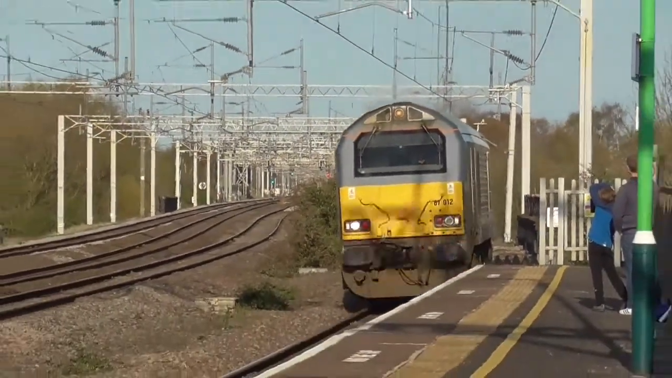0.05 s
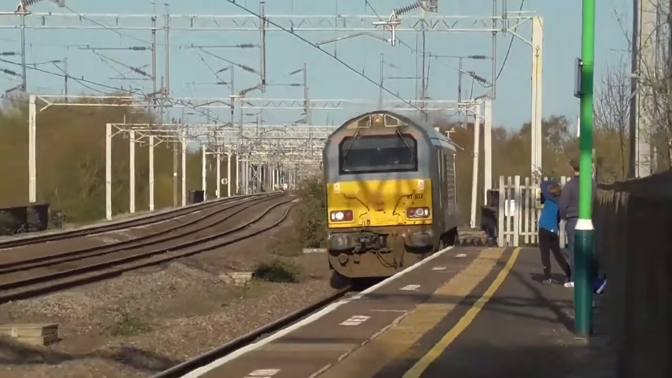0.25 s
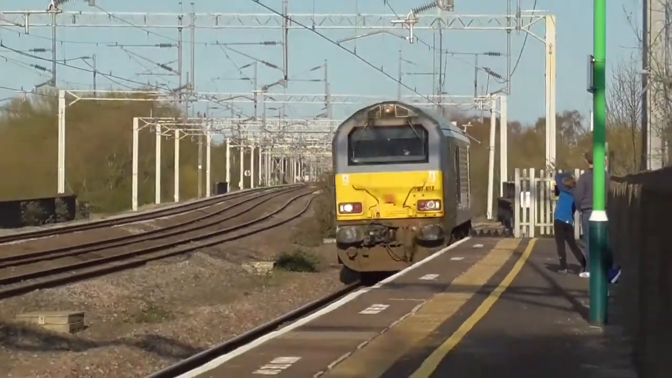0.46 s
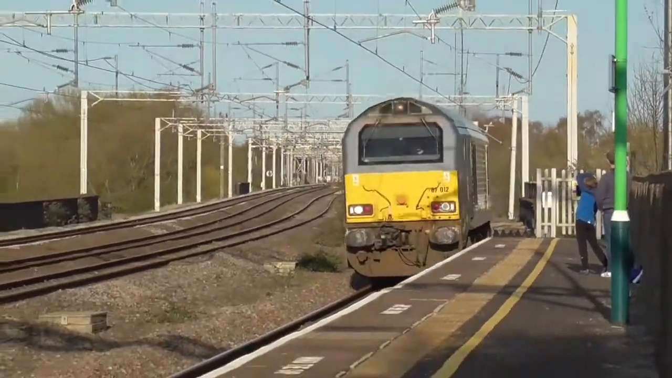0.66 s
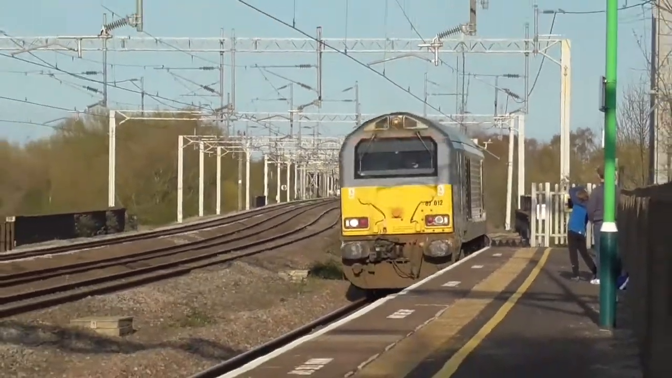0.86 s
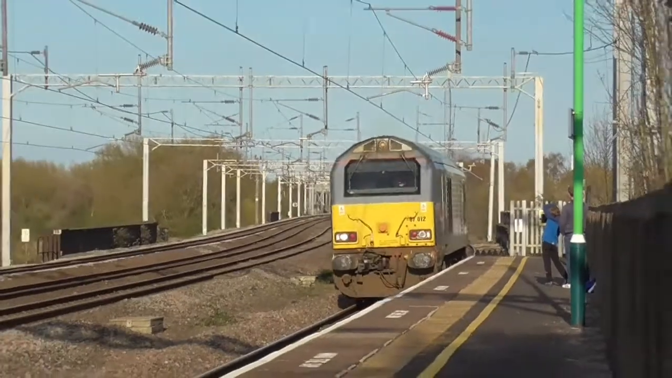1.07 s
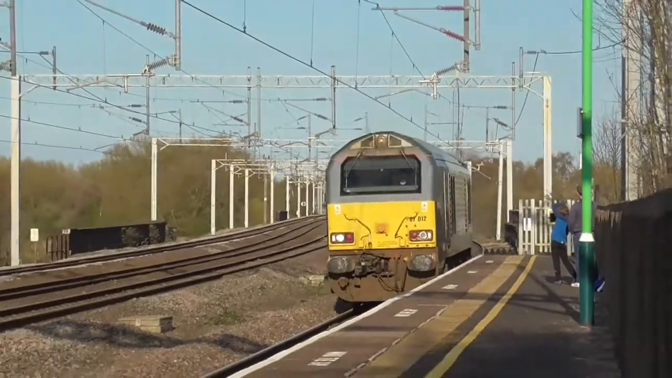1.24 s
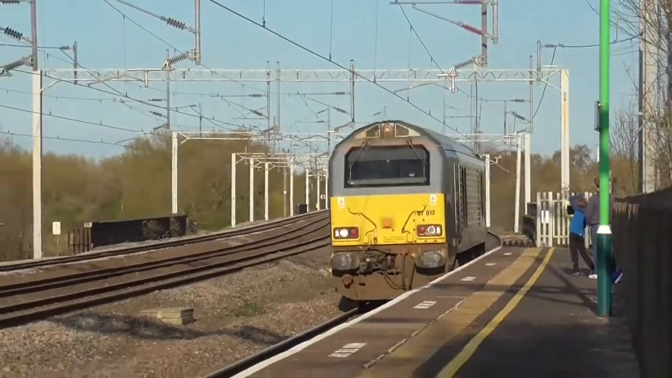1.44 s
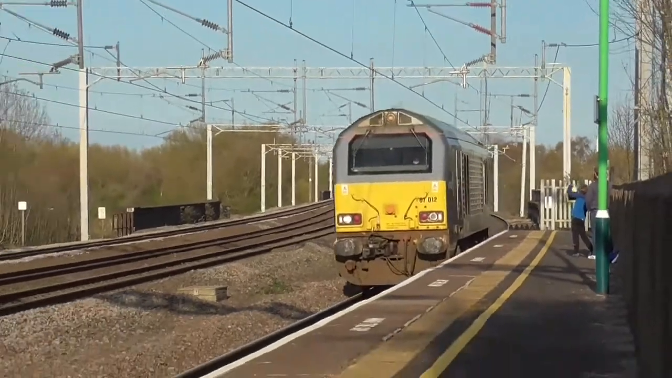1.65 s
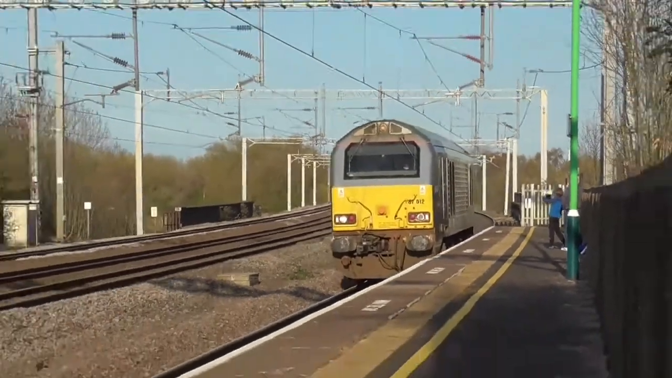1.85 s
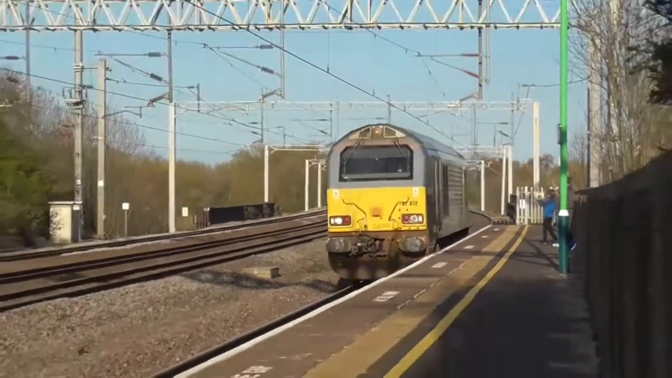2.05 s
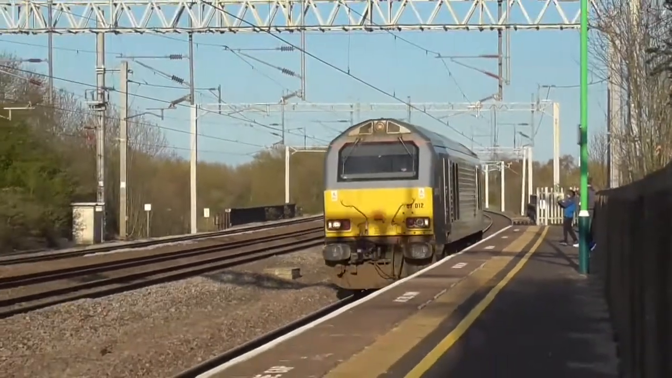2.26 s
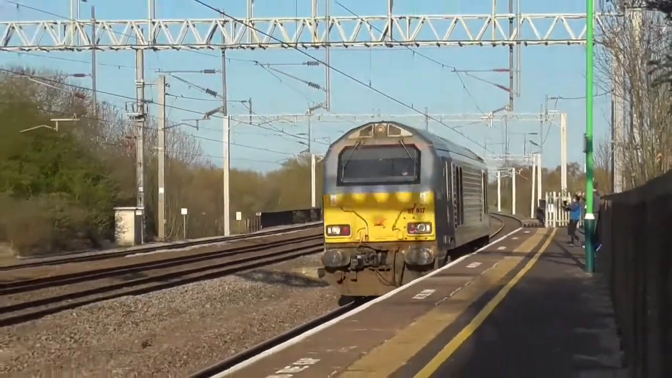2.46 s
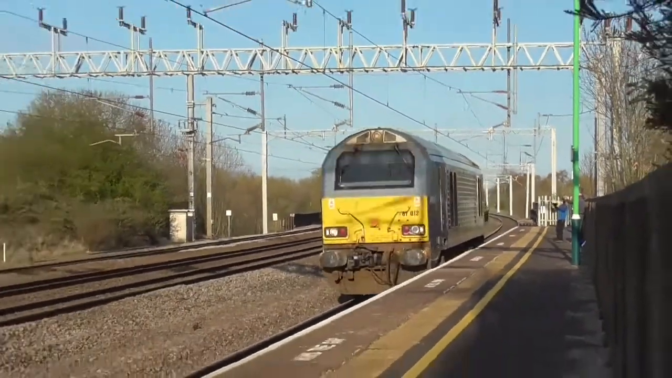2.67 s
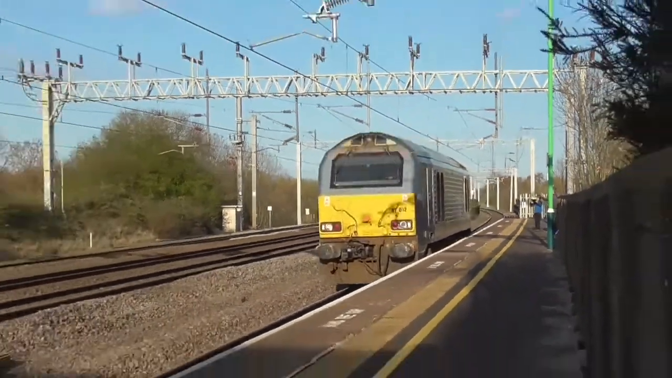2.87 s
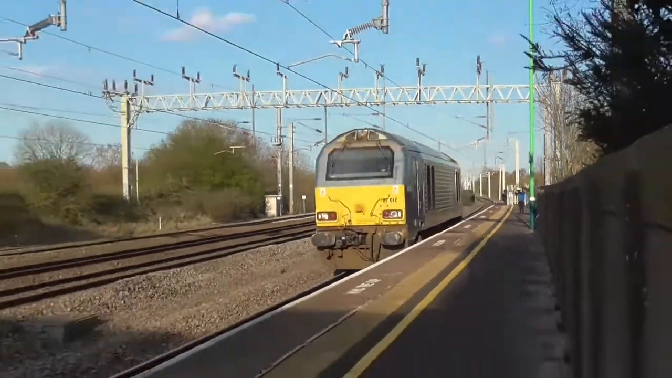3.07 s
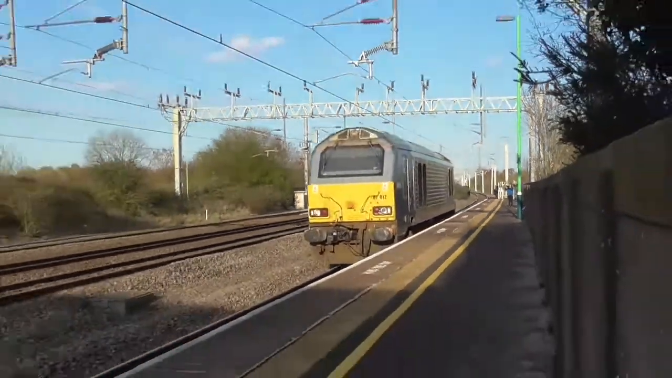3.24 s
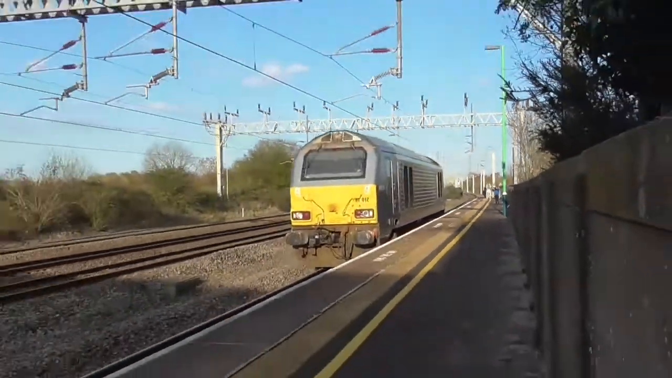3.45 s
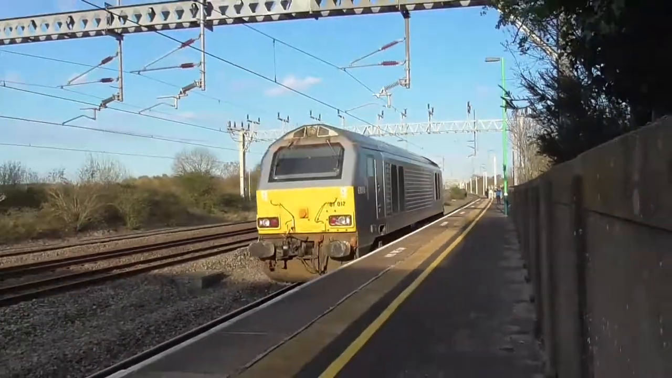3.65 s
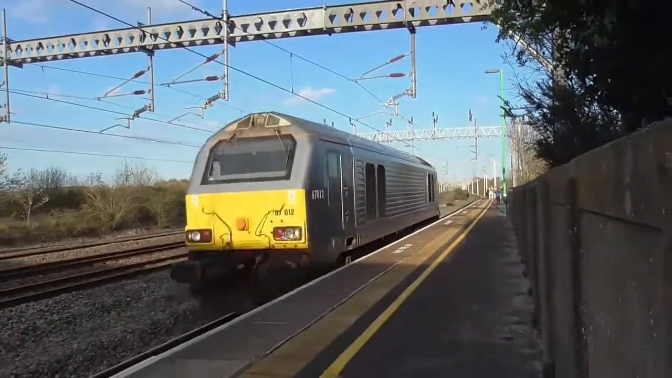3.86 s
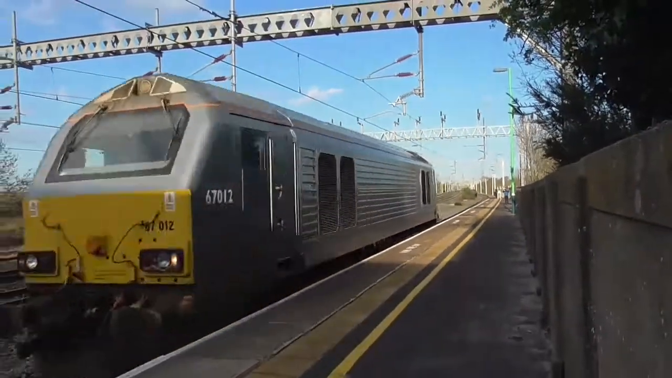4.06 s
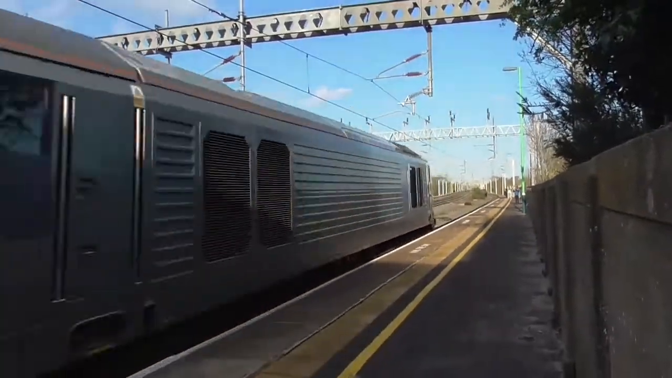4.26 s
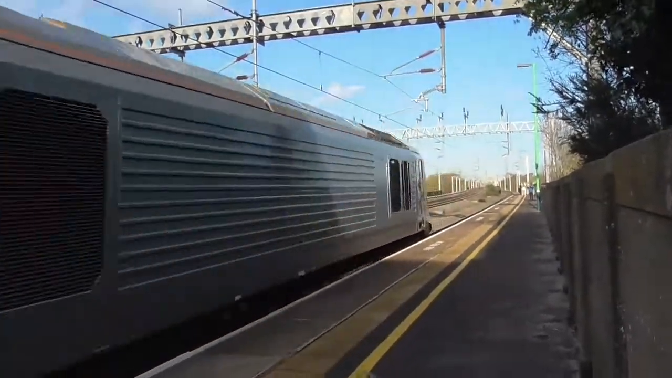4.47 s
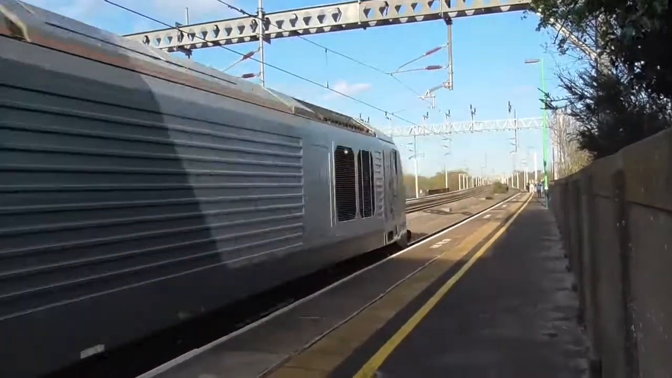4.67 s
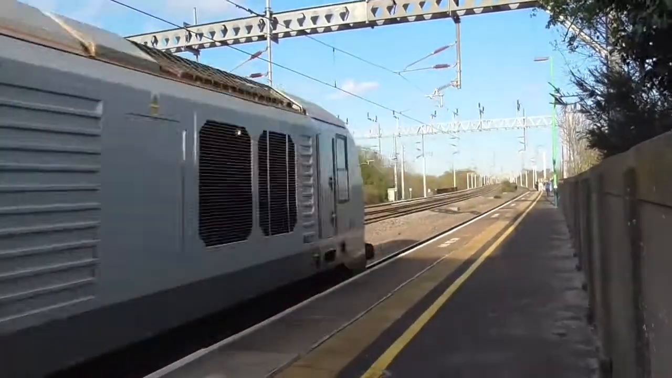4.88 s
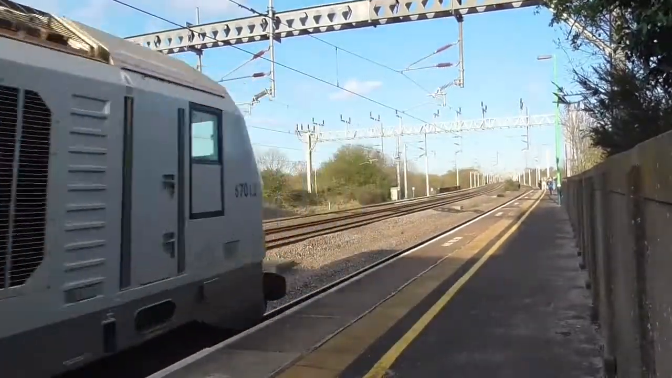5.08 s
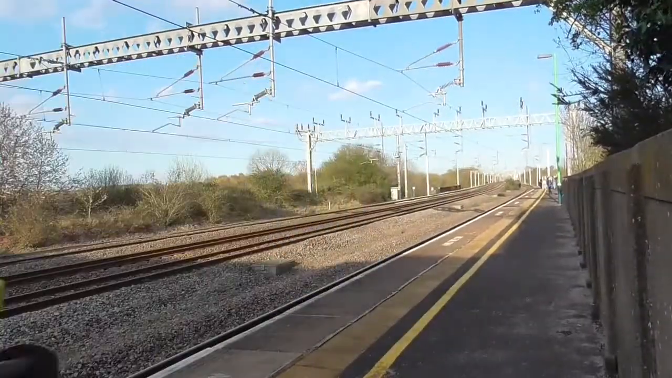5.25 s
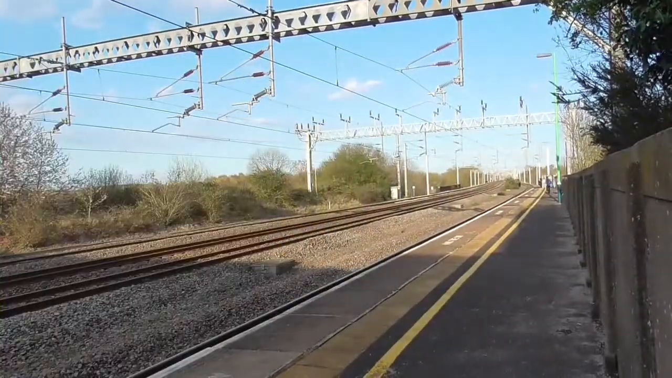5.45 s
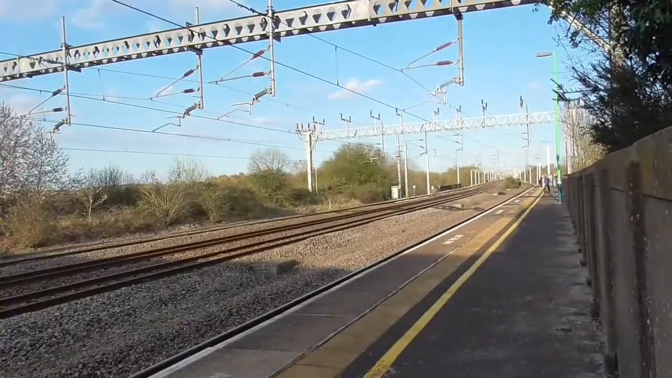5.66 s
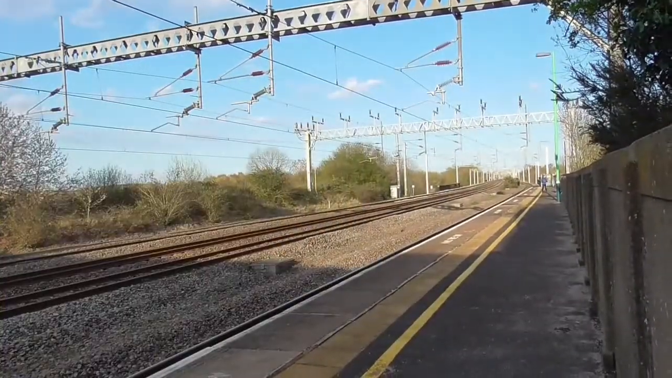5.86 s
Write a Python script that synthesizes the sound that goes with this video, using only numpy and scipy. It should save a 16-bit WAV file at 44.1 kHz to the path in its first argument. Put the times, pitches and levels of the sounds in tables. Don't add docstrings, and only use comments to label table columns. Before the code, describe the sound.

Throbbing diesel engine and wheel roar swell along the rails, a sharp air burst cuts in, then the locomotive thunders by and its pitch sags.

```python
import sys
import numpy as np
from scipy import signal
from scipy.fft import rfft, irfft, next_fast_len
from scipy.io import wavfile
from scipy.ndimage import uniform_filter1d, map_coordinates

SR = 44100
rng = np.random.default_rng(int(sys.argv[2]) if len(sys.argv) > 2 else 0)


def amplitude_ratio(level_db):
    exponent = np.asarray(level_db, float) / 20
    return 10 ** exponent


def persist_wave(psi):
    counts = np.round(np.clip(psi, -1, 1) * 32767).astype(np.int16)
    wavfile.write(sys.argv[1], SR, np.atleast_2d(counts).T)


N = 260895

# (time [s], speed [turns/s])
SHAFT_SPEED = [(0, 6.027), (3.9, 6.027), (4.3, 6.0), (4.6, 5.9), (5.0, 5.66), (5.4, 5.61), (5.92, 5.59)]
# (multiple of shaft speed [1], level [dB])
EXHAUST_ORDERS = [(6, -54.5), (9, -45), (10, -53.5), (11, -45.5), (13, -48), (15, -36), (16, -42),
                  (25, -57.5), (28, -51), (29, -56), (30, -41), (31, -57.5), (33, -50), (34, -48),
                  (35, -41), (36, -48.5), (37, -58), (38, -51.5), (39, -51.5), (41, -49.5), (42, -43.5),
                  (43, -47.5), (45, -48), (46, -46), (47, -48), (48, -42.5), (50, -53), (52, -43),
                  (56, -46.5)]
# (time [s], level [dB])
HARMONIC_SWELL = [(0, 1), (1.5, 4.5), (2.6, -9), (2.9, 11.5), (3.4, 9.5), (3.7, 8), (4.15, 7), (4.45, 10.5),
                  (4.65, -9), (5.2, -1), (5.5, 9.5), (5.92, 1)]
# (frequency [Hz], density [dB per Hz])
BOOM_SPECTRUM = [(97, -33), (165, -10), (194, -1.5), (303, -6), (368, -1), (450, -13), (580, -24),
                 (990, -120)]
ROAR_SPECTRUM = [(220, -59), (380, 4), (409, -2), (465, 2.5), (527, 2), (650, -5.5), (840, -46),
                 (1430, -120)]
CLANK_SPECTRUM = [(560, -1), (630, -2), (780, 4), (940, -3.5), (1030, -11.5)]
RATTLE_SPECTRUM = [(850, -13), (930, -1), (1240, -4.5), (1420, -6.5), (1500, -12.5), (1840, -24.5),
                   (2100, -20.5)]
JET_SPECTRUM = [(7000, -27), (7900, -4), (9300, -1.5), (11000, -5.5), (12000, -19)]
NOZZLE_SPECTRUM = [(5500, -14), (6100, -7), (6900, -2), (7700, -4.5), (8500, -32)]
FIZZ_SPECTRUM = [(10500, -16), (11500, 0), (13000, -2), (14200, -12), (14800, -26), (15700, -30)]
PIPE_SPECTRUM = [(4000, -37), (4400, -3), (4800, -2), (5600, -5.5), (6200, -11)]
PUFF_SPECTRUM = [(900, 0.5), (1400, 1), (1800, -14), (2700, -9.5), (3350, -5), (3650, -0.5), (4150, -4.5),
                 (4600, -12)]
BLADE_SPECTRUM = [(1600, -7), (1900, -8), (2250, -2.5), (2650, -10), (3100, -6.5)]
GRILLE_SPECTRUM = [(2700, -9), (3050, -6.5), (3350, -1.5), (3650, -1.5), (4150, -6.5), (4600, -6.5)]
SLIPSTREAM_SPECTRUM = [(10000, -12), (12500, -2), (14500, 0), (15700, -3)]
# (start [s], end [s], start frequency [Hz], end frequency [Hz], level [dB])
WHINE_TONES = [(-.2, 1.2, 818, 830, -48), (2.1, 3.2, 843, 848, -47), (.6, 3.6, 563, 567, -49),
               (1.2, 3.7, 476, 478, -45), (2.2, 3.7, 505, 508, -45), (2.2, 3.5, 543, 543, -46),
               (2.6, 3.7, 724, 726, -47), (1.2, 2.7, 945, 950, -55), (4.5, 5.0, 955, 940, -38),
               (2.2, 3.6, 1412, 1420, -56), (5.5, 5.92, 640, 630, -35), (4.52, 4.85, 195, 185, -25),
               (4.75, 5.15, 292, 288, -30), (2.5, 3.5, 5555, 5565, -63), (.6, .8, 2140, 2125, -62),
               (1.15, 2.8, 2195, 2224, -65), (2.68, 3.03, 2222, 2230, -58), (0, 1.2, 6850, 6850, -63),
               (.8, 1.3, 7130, 7150, -63), (1.52, 2.15, 7135, 7190, -59), (2.0, 3.7, 7200, 7300, -65),
               (2.65, 3.15, 6900, 6930, -56), (2.7, 3.4, 6570, 6585, -61), (3.85, 4.8, 8225, 8070, -46)]
# (start [s], end [s], start frequency [Hz], level [dB], width [Hz])
PANEL_HOWLS = [
    (.41, 0.456, 7400, -54, 400),
    (4.098, 4.55, 374, -26, 50),
    (4.498, 5.2, 1415, -39.5, 40.1),
    (4.75, 5.45, 489.3, -25.5, 90),
    (4.799, 5.45, 693, -23.5, 159.6),
]
# (frequency [Hz], likeness [0-1])
COHERENCE = [(60, 1), (120, 0.96), (240, 1), (480, 0.81), (950, 0.77), (1890, 0.63), (3770, 0.62),
             (7520, 0.074), (15000, 0.049)]
# (frequency [Hz], left-right difference [dB])
PORT_COLOUR = [(60, 0), (130, -1.5), (290, 1), (640, 2.0), (1410, 1.5), (3100, 1.0), (6820, 2), (15000, -2)]
# (time [s], side level [dB], left-right difference [dB], echo scramble [0-1])
PASSING_BODY = [(0, 0, 0, 0.23), (2, 0, 0.5, 0), (3.5, -0.5, -1, 0.12), (4.1, -2, -1, 0.36),
                (4.5, 2, 0, 0.84), (5.0, 3, 0.5, 0.84), (5.4, 4, 1, 0.9), (5.92, 4, 1, 1)]
APPROACH = {"deep": (-26, 4.5, 1.26, 1.27, 3), "throb": (-23, 4.5, 1.05, 1.38, 0.86),
            "gap": (-25, 4.5, 1.5, 3, 3), "drone": (-18.5, 4, 1.31, 1.35, 1.16),
            "roar": (-23, 5, 1.05, 1.47, 1.5), "clank": (-27, 4.5, 0.8051, 1.38, 1.5),
            "rattle": (-28.5, 4.5, .8, 1.5, 1.5), "blades": (-40.5, 4.5, .7, 1.43, 1.3),
            "grilles": (-40.5, 4.5, 0.77, 1.4, 2), "seep": (-47, 4, 1.13, 0.83, 1.7),
            "hiss": (-47.5, 4.6, 0.95, 1.14, 2.1)}
# (part, time [s], width [s], level [dB])
PART_SWELLS = [("throb", 5.54, .06, 4), ("deep", 2.75, .3, 2.5), ("deep", 3.56, .15, -2.5),
               ("deep", 5.41, .06, -5), ("deep", 4.9, 0.054, -10), ("throb", 2.44, 0.22, 2),
               ("throb", 2.96, 0.15, -11), ("throb", 3.7, 0.18, 4.5), ("throb", 4.76, 0.085, -16),
               ("throb", 5.92, 0.052, -4), ("grilles", 1.68, .2, 4.5), ("gap", 4.4, 0.12, -4),
               ("gap", 5.9, .12, 14.4), ("drone", 4.14, 0.048, 4), ("drone", 4.3, 0.067, -6),
               ("drone", 5.15, 0.14, -4.5), ("drone", 5.5, 0.06, -4), ("drone", 5.8, 0.15, 2.9),
               ("roar", 0.37, 0.2, -3.5), ("roar", 4.6, 0.066, -1.5), ("clank", 4.6, 0.11, -7),
               ("drone", 4.85, 0.14, -2.5), ("seep", 0.59, 0.17, -2.5), ("roar", 5.1, 0.17, -6),
               ("seep", 5.0, .25, 4), ("clank", 5.1, 0.068, -1), ("rattle", 2.84, 0.47, -3.3),
               ("rattle", 4.1, .08, -4), ("hiss", 5.15, .2, 3), ("blades", 5.1, 0.094, 5.9)]
# (time [s], roar [dB], clank [dB], rattle [dB])
RAIL_JOINTS = [
    (.76, 3.5, 2, 0),
    (1.56, 0, 2, 3),
    (3.75, 4, 5, -0.5),
    (4.92, 1, 2, -1.5),
    (5.06, 4.5, 1, 2),
    (5.2, 0.5, -4, 1),
    (5.45, -0.5, 1, 5),
    (5.8, 2.5, 3, 2),
]
VENT_KINDS = {"leak": (0.23, 8, -2, -.5, -13.5, -21), "whistle": (.17, 9.5, 1.5, -3.5, -11, -27),
              "bleed": (0.45, 13, -7, -10.5, -6, -17), "chuff": (.022, 14, -8, -9, -7, -0.5),
              "blast": (.025, 14, -7.5, -4.5, -12.5, -8.5), "spit": (0.01, 13, -3, -5.5, -4, -15)}
# (kind, start [s], hold [s], jet level [dB], fall [dB/s])
AIR_RELEASES = [("leak", -0.13, 0.046, -44.5, 44), ("spit", 0.385, 0.013, -59, 120),
                ("leak", 0.81, 0.091, -47, 46), ("chuff", 1.46, 0.011, -39.5, 103),
                ("whistle", 2.596, .4, -43.5, 20), ("bleed", 3.08, 0.47, -40.5, 40),
                ("blast", 3.756, .04, -24, 110), ("blast", 3.805, .13, -21, 110),
                ("spit", 4.24, 0.023, -27.5, 175), ("spit", 4.525, 0.025, -36.5, 51),
                ("chuff", 5.08, .015, -41.5, 110), ("spit", 5.54, .015, -55.5, 61)]


def unit(x):
    return x / np.sqrt(np.mean(x ** 2) + 1e-20)


def along(points, hz):
    f, v = np.transpose(points)
    return np.interp(np.log(hz + 1), np.log(f + 1), v)


def curves(rows):
    s, *columns = np.transpose(rows)
    return [np.interp(np.arange(N) / SR, s, column) for column in columns]


def wobble(rate):
    knots = rng.standard_normal(int(N * rate / SR) + 4)
    return map_coordinates(knots, [np.arange(N) * rate / SR], order=1)


def bell(s, width):
    return np.exp(-((np.arange(N) / SR - s) / width) ** 2)


def filtered(x, response):
    m = next_fast_len(N + 8192)
    return irfft(rfft(x, m) * response(np.fft.rfftfreq(m, 1 / SR)), m)[..., :N]


def rush(spectrum, patchy_db, streak_db):
    z = signal.stft(rng.standard_normal((2, N)), nperseg=1024)[2]
    chance = rng.standard_normal((2, *z.shape[1:]))
    patches = uniform_filter1d(uniform_filter1d(chance[0], size=8, axis=0), size=6, axis=1)
    streaks = uniform_filter1d(chance[1], size=24, axis=1)
    gain = amplitude_ratio(patchy_db * unit(patches) + streak_db * unit(streaks))
    pair = signal.istft(z * gain, nperseg=1024)[1][:, :N]
    closed = [(spectrum[0][0] * .9, -120), *spectrum, (spectrum[-1][0] * 1.1, -120)]

    def mid_side_response(hz):
        turn = np.arccos(np.clip(along(COHERENCE, hz), -1, 1)) / 2
        return amplitude_ratio(along(closed, hz)) * [np.cos(turn), np.sin(turn)]

    mid, side = filtered(pair, mid_side_response)
    return unit(np.array([mid + side, mid - side]))


def heard(part):
    db, s, reach, coming, going = APPROACH[part]
    away = (np.arange(N) / SR - s) / reach
    swells = sum(gain_db * bell(at, width) for name, at, width, gain_db in PART_SWELLS if name == part)
    return db - 10 * np.log10(1 + away ** 2) * np.where(away < 0, coming, going) + swells


def engine():
    turns = np.cumsum(curves(SHAFT_SPEED)[0]) / SR - .785
    swell_db = curves(HARMONIC_SWELL)[0]
    scramble = curves(PASSING_BODY)[2]
    groups = np.zeros((4, 2, N))
    faint = dict.fromkeys(range(17, 56), -62)
    for k, db in {**faint, **dict(EXHAUST_ORDERS)}.items():
        high, fourth = k > 17, k == 48
        lag = .81 + .2 * (k == 13) + rng.uniform() * high
        drift = (.08 + .3 * high) * wobble(2)
        drift = drift + (.25 * scramble * (1 + 7 * high) + .3 * fourth) * wobble(7)
        ports = np.array([[1], [-1]]) * (.19 + .1 * scramble * high) * (.4 + wobble(2))
        level_db = db + 45 + swell_db * fourth - 5 * scramble * (k == 16)
        level_db = level_db + (.6 + scramble + high * (not fourth) * 1.6) * wobble(2.5)
        level_db = level_db + 2 * fourth * wobble(12)
        tone = np.cos(2 * np.pi * (k * turns - lag) + drift + ports)
        groups[np.digitize(k, [14, 17, 28])] += amplitude_ratio(level_db) * tone
    deep, throb, gap, drone = (unit(group) for group in groups)
    deep_noise = rush([(24, -16), (50, 0), (100, 0), (115, -6)], patchy_db=1, streak_db=0)
    gap_noise = rush([(100, 17), (120, -7), (150, 0.0), (170, 7)], patchy_db=1.0, streak_db=2.5)
    deep = deep + amplitude_ratio(-14 + 7 * scramble) * deep_noise
    gap = amplitude_ratio(-3) * gap + amplitude_ratio(-4) * gap_noise
    drone = amplitude_ratio(-2) * drone + amplitude_ratio(-5) * rush(BOOM_SPECTRUM, patchy_db=2, streak_db=1)
    parts = {"deep": deep, "throb": throb, "gap": gap, "drone": drone}
    return sum(amplitude_ratio(heard(name)) * part for name, part in parts.items())


def rolling():
    shake = amplitude_ratio(0.58 * wobble(11))
    jolts_db = sum(np.array(db)[:, None] * bell(s, .05) for s, *db in RAIL_JOINTS)
    parts = zip(("roar", "clank", "rattle"), jolts_db, (ROAR_SPECTRUM, CLANK_SPECTRUM, RATTLE_SPECTRUM))
    return shake * sum(amplitude_ratio(heard(name) + db) * rush(spectrum, patchy_db=0.62, streak_db=2.5)
                       for name, db, spectrum in parts)


def whines():
    out = np.zeros((2, N))
    narrow = [(*row, 6 + .0025 * row[2]) for row in WHINE_TONES]
    sag_per_s = .15
    broad = [(s0, s1, hz, hz * (1 - sag_per_s * (s1 - s0)), db, width)
             for s0, s1, hz, db, width in PANEL_HOWLS]
    for s0, s1, hz0, hz1, db, width in narrow + broad:
        a, b = max(round(s0 * SR), 0), min(round(s1 * SR), N)
        phase = 2 * np.pi * np.cumsum(np.linspace(hz0, hz1, b - a)) / SR
        knots = rng.standard_normal((4, int(width * (b - a) / SR) + 3))
        at = np.linspace(0, knots.shape[1] - 1, b - a)
        blur = [np.interp(at, np.arange(len(row)), row) for row in knots]
        steady = max(1.1 - width / 70, 0)
        near = (steady + blur[0]) * np.cos(phase) + blur[1] * np.sin(phase)
        other = blur[2] * np.cos(phase) + blur[3] * np.sin(phase)
        turn = np.arccos(np.clip(along(COHERENCE, hz0), -1, 1)) / 2
        both = np.cos(turn) * near + np.sin(turn) * other * [[1], [-1]]
        out[:, a:b] += amplitude_ratio(db) * signal.windows.tukey(b - a, .35) * both
    return out


def releases():
    tail_db, tail_db_per_s = -13, 44
    power = np.zeros((5, N))
    for kind, s, hold, db, fall in AIR_RELEASES:
        rise, rise_db, *mix_db = VENT_KINDS[kind]
        t = np.arange(N) / SR - s
        after = np.maximum(t - rise - hold, 0)
        decay_db = np.maximum(-fall * after, tail_db - tail_db_per_s * after)
        shape_db = decay_db - rise_db * np.clip(1 - t / rise, 0, 1)
        power += (t > 0) * amplitude_ratio(db + shape_db) ** 2 * amplitude_ratio([0, *mix_db])[:, None] ** 2
    return power


def air():
    flutter = amplitude_ratio(0.48 * wobble(23.9))
    power = releases()
    seep_db, hiss_db = heard("seep"), heard("hiss")
    power[:4] += amplitude_ratio([seep_db, hiss_db, seep_db - 8.5, hiss_db - 1.5]) ** 2
    spectra = (JET_SPECTRUM, NOZZLE_SPECTRUM, FIZZ_SPECTRUM, PIPE_SPECTRUM, PUFF_SPECTRUM)
    return flutter * sum(gain * rush(spectrum, patchy_db=0.5, streak_db=2.8)
                         for gain, spectrum in zip(np.sqrt(power), spectra))


def fans():
    scramble = curves(PASSING_BODY)[2]
    blades_db = heard("blades")
    thin = amplitude_ratio(blades_db - 23 + 12 * scramble)
    thin = thin + amplitude_ratio(-12) * np.sqrt(releases()[2])
    top = thin * rush(SLIPSTREAM_SPECTRUM, patchy_db=1, streak_db=0)
    blades = amplitude_ratio(blades_db) * rush(BLADE_SPECTRUM, patchy_db=0.0, streak_db=3.0)
    grilles = amplitude_ratio(heard("grilles")) * rush(GRILLE_SPECTRUM, patchy_db=1.6, streak_db=2.3)
    return top + blades + grilles


def gain_control():
    fall_s, hold_s, back_s = 0.099, .12, 0.11
    knees = 3.79 + np.cumsum([0, fall_s, hold_s, back_s])
    return amplitude_ratio(-11 * np.interp(np.arange(N) / SR, knees, [0, 1, 1, 0]))


def scene():
    side_db, pan_db, _ = curves(PASSING_BODY)
    body = gain_control() * (engine() + rolling() + whines()) + fans()
    left, right = body * amplitude_ratio([pan_db / 2, -pan_db / 2]) + air()
    mid = (left + right) / 2
    side = (left - right) / 2 * amplitude_ratio(side_db)
    return np.array([mid + side, mid - side])


def top_cut(x):
    return signal.sosfilt(signal.butter(12, 15640, fs=SR, output="sos"), x)


def record(dry):
    def port_response(hz):
        half_db = along(PORT_COLOUR, hz) / 2
        return amplitude_ratio([half_db, -half_db])

    mix = filtered(dry, port_response)
    return top_cut(mix)


dry = scene()
out = record(dry)
persist_wave(out)
```